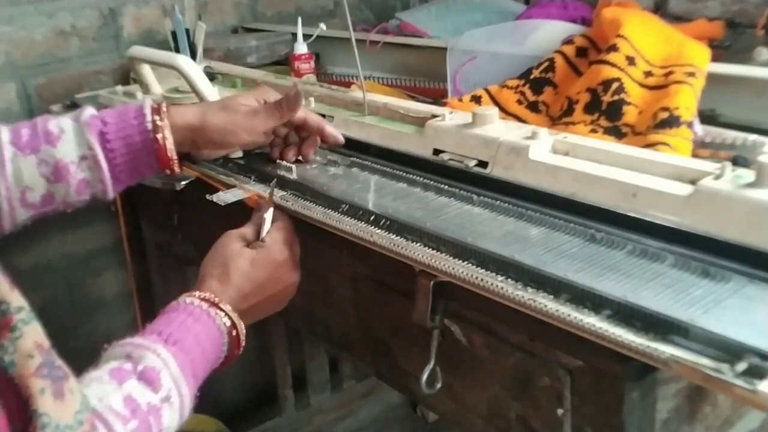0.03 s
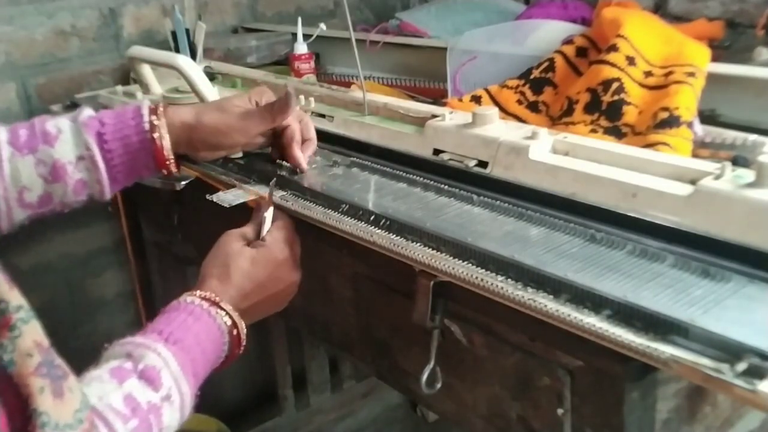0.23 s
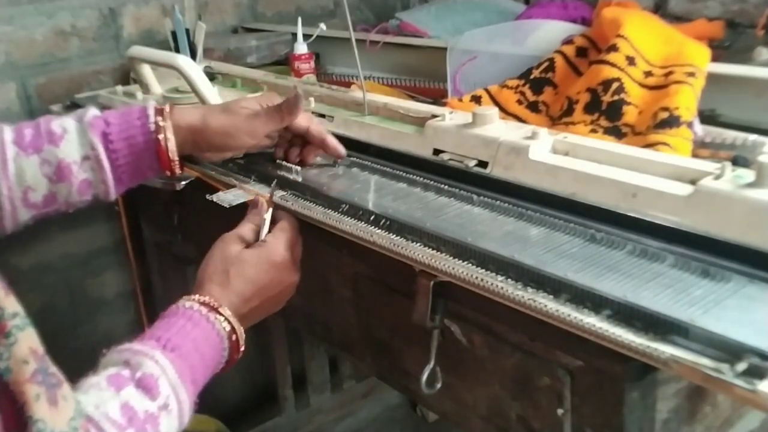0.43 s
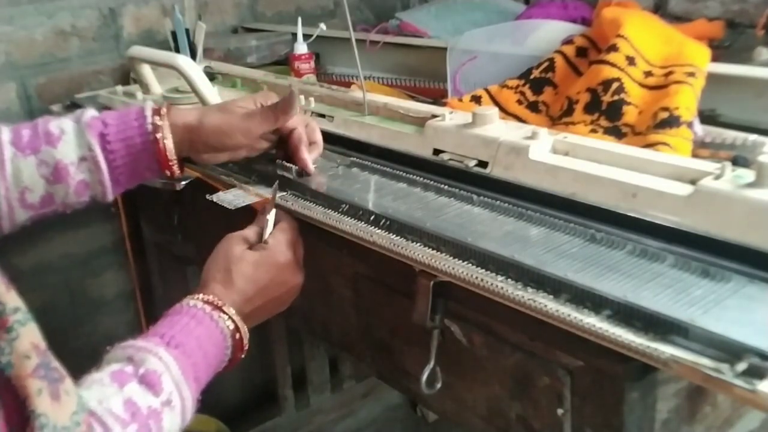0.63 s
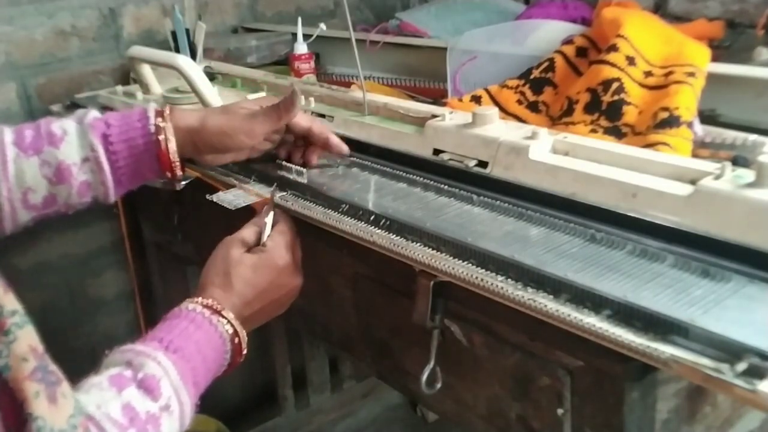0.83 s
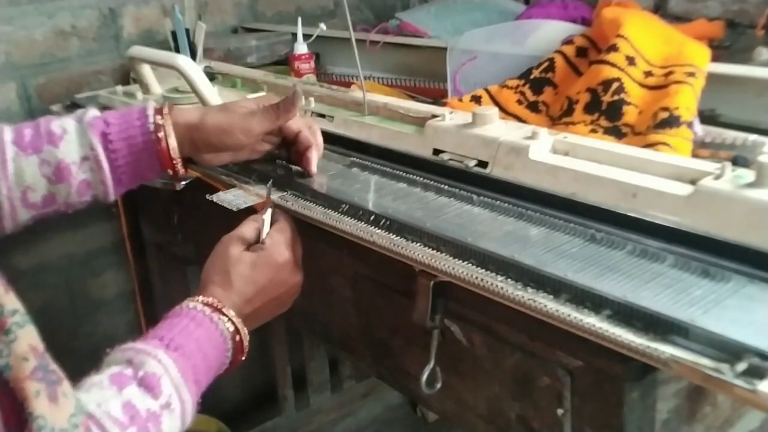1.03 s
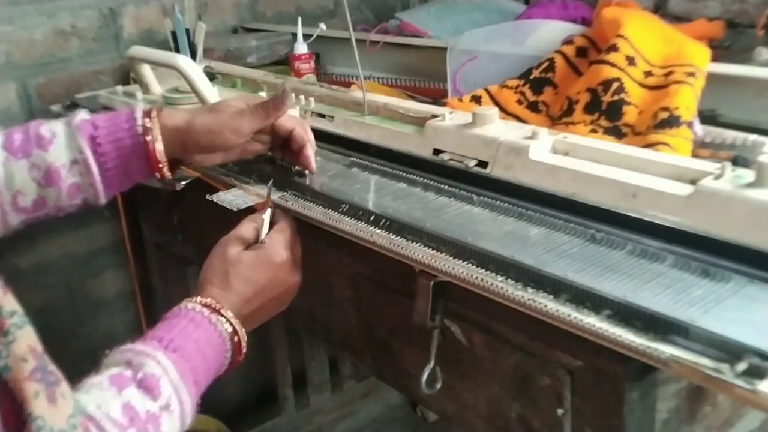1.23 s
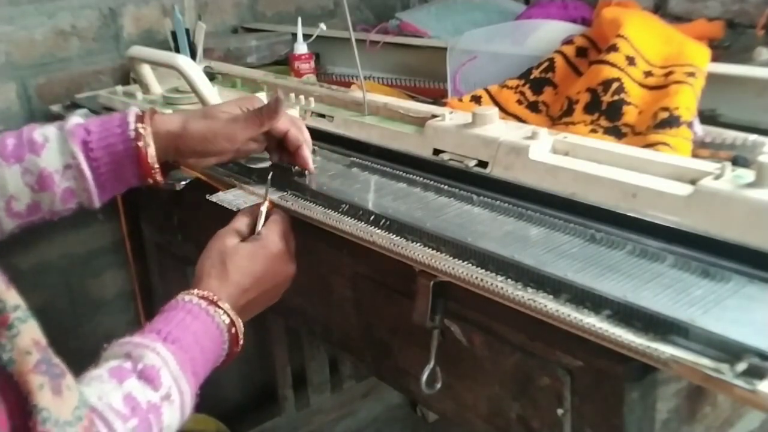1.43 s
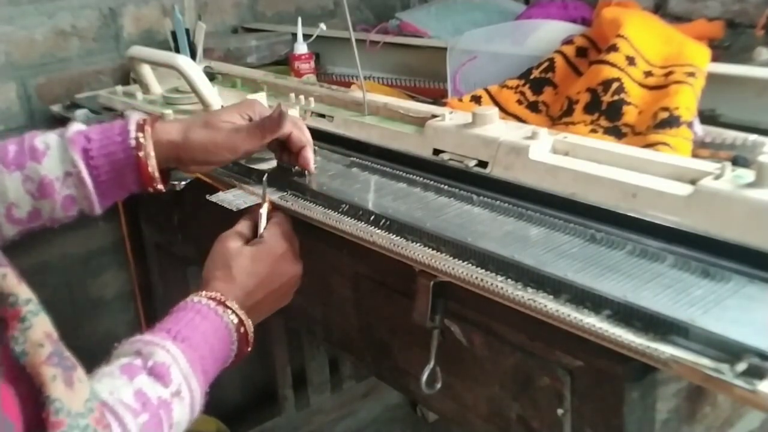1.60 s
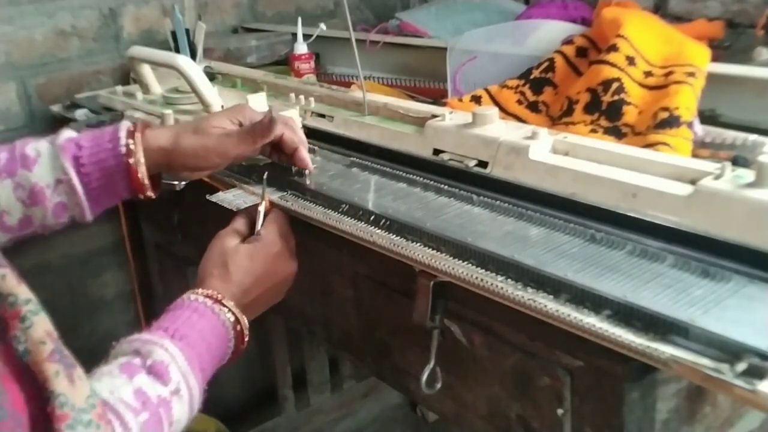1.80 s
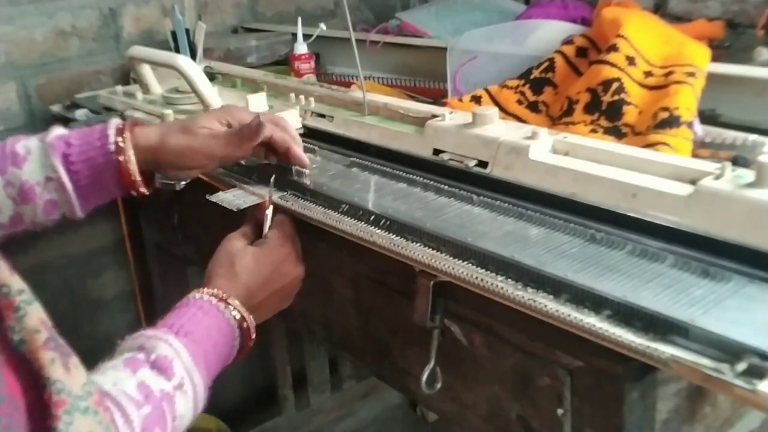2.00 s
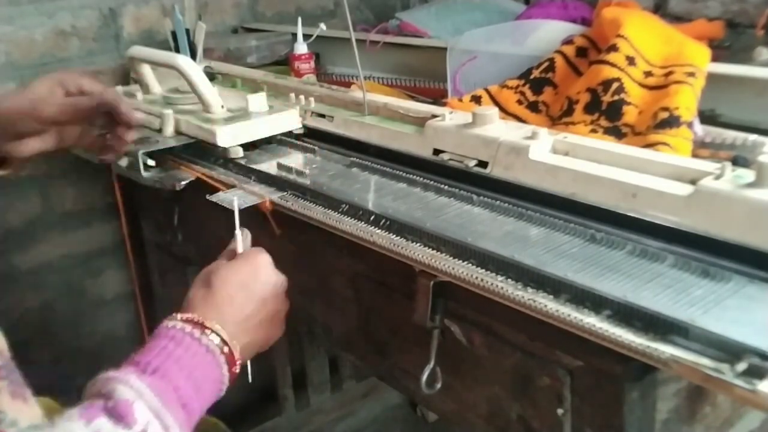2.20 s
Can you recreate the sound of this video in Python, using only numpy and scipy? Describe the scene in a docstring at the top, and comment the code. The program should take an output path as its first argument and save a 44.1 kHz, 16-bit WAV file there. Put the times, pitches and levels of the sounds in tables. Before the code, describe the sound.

Knitting machine needles clack sharply at about 0.2, 0.7 and 1.0 seconds, each led in by a light tick and briefly ringing the steel bed. Soft bumps and faint ticks come and go, and loose steel jingles lightly at 2.3 seconds. Behind them are a small room's quiet rumble and hum, joined from 0.6 seconds by a very faint, high, cricket-like trill.

```python
"""A hand sets the needles of a flat knitting machine in a small hard room, over a low rumble and a hum.
Soft bumps on the bed and faint ticks come and go from the start. Three sharp clacks, at 0.2, 0.7 and
1.0 s, are each led in by a light tick: a needle catches, strikes its stop and rings the steel bed.
From 0.6 s a thin high trill, like distant crickets, runs behind; a faint tone passes at 1.8 s.
At 2.3 s the hand reaches the carriage and loose steel jingles briefly."""
import sys
import numpy as np
from scipy import signal
from scipy.fft import rfft, irfft, next_fast_len
from scipy.io import wavfile
from scipy.ndimage import map_coordinates

SR = 44100
rng = np.random.default_rng(int(sys.argv[2]) if len(sys.argv) > 2 else 0)


def store_pcm(level_fs):
    """Save levels as 16-bit WAV."""
    pcm = np.round(np.clip(level_fs, -1, 1) * 32767).astype(np.int16)
    wavfile.write(sys.argv[1], SR, np.atleast_2d(pcm).T)


N = 103635


def amp(db):
    """Decibels to amplitude ratio."""
    return 10 ** (np.asarray(db) / 20)

def unit(x):
    """Normalisation to rms 1."""
    return x / np.sqrt(np.mean(x ** 2) + 1e-20)

def along(points, hz):
    """Interpolation of (frequency_hz, value) points on a log frequency axis."""
    f, v = np.transpose(points)
    return np.interp(np.log(hz + 1), np.log(f + 1), v)

def curve(rows):
    """Linear interpolation of (time_s, value) points at every sample."""
    return np.interp(np.arange(N) / SR, *np.transpose(rows))

def wobble(rate_hz):
    """Smooth random modulation: a spline through Gaussian knots."""
    knots = rng.standard_normal(int(N * rate_hz / SR) + 4)
    return map_coordinates(knots, [np.arange(N) * rate_hz / SR])

def pan(db):
    """Gains for a level difference, left over right."""
    return amp(np.array([[db], [-db]]) / 2)

def filtered(x, response):
    """Zero-phase filtering: the spectrum is multiplied by a frequency response."""
    m = next_fast_len(x.shape[-1] + SR // 2)
    return irfft(rfft(x, m) * response(np.fft.rfftfreq(m, 1 / SR)), m)[..., :x.shape[-1]]

def minimum_phase(gain, size=2048):
    """A causal impulse response of energy 1, from the folded cepstrum of a gain curve."""
    cepstrum = irfft(np.log(np.maximum(gain(np.fft.rfftfreq(size, 1 / SR)), 1e-6)))
    cepstrum[1:size // 2] *= 2
    cepstrum[size // 2 + 1:] = 0
    impulse = irfft(np.exp(rfft(cepstrum)))
    return impulse / np.linalg.norm(impulse)

def add(out, start_s, x):
    """Superposition of x on out."""
    i = max(0, round(start_s * SR))
    out[:, i:i + x.shape[-1]] += x[..., :max(0, N - i)]

def spread(pair, coherence):
    """Partial coherence: two independent noises mix as mid and side."""
    turn = lambda hz: np.arccos(np.clip(along(coherence, hz), -1, 1)) / 2
    mid, side = filtered(pair, lambda hz: np.array([np.cos(turn(hz)), np.sin(turn(hz))]))
    return np.array([mid + side, mid - side])

def chatter(envelope):
    """A noise burst of energy 1; partial spectral flattening keeps it unpitched."""
    raw = even = envelope * rng.standard_normal(len(envelope))
    for _ in range(4):
        even = irfft(np.exp(1j * np.angle(rfft(even))), len(raw)) * np.minimum(2 * envelope, 1)
    burst = unit(even) + .9 * unit(raw)
    return burst / np.linalg.norm(burst)

ATTACK_S, RELEASE_S = 0.00025, 0.0019
def contact(hold_s, colour, tilt_db_per_octave):
    """Source and filter: two parts chatter briefly, coloured by the body that is struck."""
    t = np.arange(SR // 10) / SR
    envelope = (1 - np.exp(-t / ATTACK_S)) * np.exp(-np.maximum(t - hold_s, 0) / RELEASE_S)
    body = minimum_phase(lambda hz: colour(hz) * amp(tilt_db_per_octave * np.log2(hz + 200)))
    hit = signal.fftconvolve(chatter(envelope), body)
    return hit * np.linalg.norm(envelope) / np.linalg.norm(hit)

def ringing(modes, build_s):
    """Free vibration: damped modes with jittering phase, different in each channel."""
    t = np.arange(SR // 2) / SR
    ring = np.zeros((2, len(t)))
    for hz, db, t60_s in modes:
        decay = amp(db + rng.normal(0, 1.8) - 60 * t / t60_s)
        phase = 2 * np.pi * (hz * t + rng.random((2, 1)))
        ring += decay * np.sin(phase + .5 * wobble(62)[:len(t)])
    return ring * (1 - np.exp(-t / build_s))

# Reverberation time: frequency_hz, t60_s
ROOM_DECAY = [(150, 0.5841), (400, 0.26), (1040, 0.2929), (2760, 0.2853), (7280, 0.2341), (14000, 0.1523)]
# Colour of the reverberation: frequency_hz, gain_db
ROOM_SPECTRUM = [(100, 5.5), (300, 4.5), (550, 6), (850, 5.5), (2000, -3), (5000, 0.5), (8500, -7),
                 (12000, 3), (15000, -8), (16000, -8.5)]
# Its left-right likeness: frequency_hz, coherence
ROOM_COHERENCE = [(100, 1), (300, 0.6), (700, .4), (1500, 0), (4000, 0.11)]
ROOM_DB, ROOM_DELAY_S, ROOM_BUILD_S = -1, 0.001, 0.0027
def room_tail():
    """Diffuse reverberation: reflections build up, then absorption takes the treble first."""
    noise = spread(rng.standard_normal((2, SR // 2)), ROOM_COHERENCE)
    hz, t, bands = signal.stft(noise, SR, nperseg=256)
    tail = signal.istft(bands * amp(-60 * t / along(ROOM_DECAY, hz)[:, None]), SR, nperseg=256)[1]
    age_s = np.maximum(np.arange(tail.shape[1]) / SR - ROOM_DELAY_S, 0)
    tail *= 1 - np.exp(-age_s / ROOM_BUILD_S)
    return filtered(tail / np.linalg.norm(tail[0]), lambda f: amp(along(ROOM_SPECTRUM, f)))

SCATTER_S, SCATTER_DB, SCATTER_LOW_HZ, RADIATION_LOW_HZ = 0.0022, 3, 1170, 892
def in_room(x, room_db, pan_db):
    """Multipath propagation: direct sound, treble scattered off the machine, and wall reflections."""
    highpass = lambda y, hz: signal.lfilter(*signal.butter(1, hz, 'high', fs=SR), y)
    tail = room_tail()
    fade = np.exp(-np.arange(tail.shape[1]) / SR / SCATTER_S)
    near = amp(SCATTER_DB) * highpass([chatter(fade), chatter(fade)], SCATTER_LOW_HZ)
    near[0, 0] += 1
    near[1, 4] += 1  # the direct sound reaches the right 4 samples later
    near /= np.linalg.norm(near, axis=1, keepdims=True)
    near = highpass(near, RADIATION_LOW_HZ)  # small parts radiate little bass
    return signal.fftconvolve(x[None], near * pan(pan_db) + amp(ROOM_DB + room_db) * tail, axes=1)

# Colour of the ambient noise: frequency_hz, relative_db
AIR_SPECTRUM = [(20, -30), (35, -10), (70, -7.5), (130, -5.5), (200, -10.5), (400, -15), (750, -17.5),
                (1050, -22), (2800, -25), (6000, -27), (12000, -29.5), (15500, -33)]
# Its left-right likeness: frequency_hz, coherence
AIR_COHERENCE = [(50, .93), (150, .85), (400, 0.68), (1000, 0.056), (4000, 0), (15000, 0.011)]
# Its course: time_s, level_db
AIR_LEVEL = [(0, -65), (.8, -63.5), (1.25, -63), (1.55, -67), (2.35, -67)]
AIR_TOP_HZ, RUMBLE_HZ, RUMBLE_SWING_DB = 15600, 600, -1.5
def room_air():
    """Broadband ambient noise; amplitude modulation of its low band makes a restless rumble."""
    noise = spread(rng.standard_normal((2, N)), AIR_COHERENCE)
    air = unit(filtered(noise, lambda hz: amp(along(AIR_SPECTRUM, hz)) * (hz < AIR_TOP_HZ)))
    low = filtered(air, lambda hz: 1 / (1 + (hz / RUMBLE_HZ) ** 4))
    rumble = low * pan(db=1.5) * amp(RUMBLE_SWING_DB * wobble(5.2))
    return amp(curve(AIR_LEVEL)) * (air - low + rumble)

# Course of the hum's lower tone: time_s, level_db
HUM_LEVEL = [(0, -56.5), (.06, -63), (.18, -58), (.3, -60.5), (.52, -64), (.58, -74), (.72, -62.5),
             (.82, -58), (.91, -78), (1.1, -85), (1.24, -60.5), (1.33, -77.5), (1.42, -67.5), (1.9, -68),
             (2.1, -67.5), (2.35, -72.5)]
HUM_HZ, UPPER_HZ, UPPER_DB = 54.7, 100.3, -70.5
def hum():
    """Two low tones waver by amplitude and phase modulation."""
    t = np.arange(N) / SR
    lower = amp(curve(HUM_LEVEL)) * unit(np.sin(2 * np.pi * HUM_HZ * t + 0.78 * wobble(4.8)))
    upper = amp(UPPER_DB + 2 * wobble(19)) * unit(np.sin(2 * np.pi * UPPER_HZ * t + 2.7 * wobble(17)))
    return (lower + upper) * pan(db=3.5)

# Colour of a bump: frequency_hz, gain_db
BUMP_SPECTRUM = [(40, -17.5), (150, -5), (300, -1.5), (750, -2.5), (1200, -10), (2800, -9.5), (6000, -19.5),
                 (15000, -30.5)]
# Touches on the bed: start_s, level_db, hold_s, tilt_db_per_octave
BED_BUMPS = [(.003, -59, 0.016, 5.5), (0.421, -60, 0.024, 1.5), (0.909, -64, .03, 4.5),
             (1.388, -72.5, .04, 1.5), (1.772, -60.5, 0.012, 0.5), (1.865, -70, .03, -1),
             (2.001, -62, 0.0097, -3.5), (2.024, -67, .03, -2)]
def bumps():
    """Soft impact: hand and tool meet the bed in long, weak contacts."""
    out = np.zeros((2, N))
    for start_s, db, hold_s, tilt in BED_BUMPS:
        touch = contact(hold_s, lambda hz: amp(along(BUMP_SPECTRUM, hz)), tilt)
        add(out, start_s, amp(db) * in_room(touch, room_db=-1, pan_db=1.5))
    return out

# Resonances of the needle bed: centre_hz, width_hz, peak_db
BED_RESONANCES = [(900, 160, -7.5), (1370, 200, -9.5), (2176, 850, -12), (3450, 330, -10), (4770, 720, -10),
                  (6350, 770, -7.5), (8310, 730, 1), (8910, 450, -1), (10330, 400, -8.5), (13100, 630, -3)]
# Broad colour of a hard impact: frequency_hz, gain_db
SNAP_SPECTRUM = [(40, -25.5), (150, -19.5), (400, -15.5), (900, -18), (2000, -14), (4000, -9.5),
                 (7500, -3.5), (11000, -7.5), (14000, -5.5), (15200, 0), (16400, -40.5)]
def bed_response(hz):
    """Frequency response of the bed: resonance peaks add in power to a broad snap."""
    peaks = sum(amp(db) ** 2 / (1 + (2 * (hz - centre) / width) ** 2)
                for centre, width, db in BED_RESONANCES)
    return np.sqrt(amp(along(SNAP_SPECTRUM, hz)) ** 2 + 2 * peaks * hz / (hz + 300))

# Needles catching: start_s, level_db, hold_s, tilt_db_per_octave, body_db, room_db
NEEDLE_TICKS = [(0.122, -66, 0.0039, -2, 0, 0), (0.15, -57, .003, 0.5, 11, 0),
                (0.189, -39, 0.003, 2, 2, 6.5), (0.6382, -39, 0.0021, 0, 4, 4),
                (0.643, -38, 0.0012, 5, 11, -3.5), (2.2693, -44.5, 0.00293, 2.5, -7, 1),
                (2.279, -60.5, 0.0063, 6, -3, -24), (.537, -61, .003, 1, 0, 1), (.789, -60, .002, 1, 0, 1),
                (1.02, -53, .007, -2.5, 4, 1), (1.484, -53, .002, 0, 4, 0), (1.775, -60, .002, -5, 13, -1),
                (2.297, -44, .006, 1.2, -4, 1), ]
# Needles striking their stop: same columns
NEEDLE_CLACKS = [(0.2206, -14, 0.0035, -0.22, -3, 0), (0.6698, -22, 0.0055, 1, -0.5, -2),
                 (1.045, -15, 0.0019, 0.64, 0.5, 3.5)]
# Modes of the bed after a clack: pitch_hz, relative_db, t60_s
BED_MODES = [(320, -42, .3), (800, -38, .28), (928, -32, .26), (1322, -35, .25), (4474, -38, .33),
             (5420, -34, .2), (6085, -34, .22), (6250, -35, .2), (6432, -32, .22), (8909, -29, .18),
             (9466, -31, .18), (10503, -33, .17), (13100, -32, .15)]
BODY_HZ, BODY_OCTAVES = 2050, 0.59
def needles():
    """Impact excitation: needles tick and clack, and each clack leaves the bed's modes ringing."""
    out = np.zeros((2, N))
    body_band = lambda hz: np.exp(-(np.log2((hz + 1) / BODY_HZ) / BODY_OCTAVES) ** 2)
    for start_s, db, hold_s, tilt, body_db, room_db in NEEDLE_CLACKS + NEEDLE_TICKS:
        hit = contact(hold_s, lambda hz: bed_response(hz) * amp(body_db * body_band(hz)), tilt)
        add(out, start_s, amp(db) * in_room(hit, room_db, pan_db=-1.5))
    for start_s, db, *_ in NEEDLE_CLACKS:
        add(out, start_s, amp(db) * ringing(BED_MODES, build_s=0.00486))
    return out

# Cricket-like trills: start_s, end_s, pitch_hz, level_db, chirp_rate_hz, pan_db
TRILLS = [(.57, 1.12, 3545, -77.5, 10, -2), (1.12, 2.4, 3545, -72, 10, -3), (1.85, 2.4, 3470, -75, 11, -3)]
CHIRP_BEND_HZ, CHIRP_DEPTH_DB, FLUTTER_HZ, FLUTTER_DB = 22, 1.5, 25, 2
def trill():
    """Amplitude and frequency modulation: chirps swell and bend a tone, heard mostly off the walls."""
    out, t = np.zeros((2, N)), np.arange(N) / SR
    for start_s, end_s, hz, db, rate_hz, pan_db in TRILLS:
        chirp = np.sin(2 * np.pi * rate_hz * t + wobble(4))
        pitch = hz + CHIRP_BEND_HZ * chirp + FLUTTER_HZ * wobble(120)
        swell = amp(CHIRP_DEPTH_DB * chirp + FLUTTER_DB * wobble(70))
        tone = unit(swell * np.sin(2 * np.pi * np.cumsum(pitch) / SR))
        direct = tone * np.array([[1], [-1]])  # left and right in antiphase
        echo = unit(signal.fftconvolve(tone[None], room_tail(), axes=1)[:, :N])
        gate = np.clip(np.minimum(t - start_s, end_s - t) / 0.0072, 0, 1)
        out += amp(db) * gate * pan(pan_db) * unit(.5 * direct + .9 * echo)
    return out

def thin_tone(start_s=1.78, end_s=1.99, pitch_hz=812, level_db=-77):
    """A faint sinusoid comes and goes under random amplitude and phase modulation."""
    t = np.arange(N) / SR
    gate = np.clip(np.minimum(t - start_s, end_s - t) / 0.035, 0, 1)
    envelope = gate * amp(level_db + 1.6 * wobble(20))
    return envelope * unit(np.sin(2 * np.pi * pitch_hz * t + .5 * wobble(30.4)))

# Modes of the loose steel: pitch_hz, relative_db, t60_s
STEEL_MODES = [(4480, -5, .14), (5050, 3, .15), (5210, -6, .12), (6508, -6, .11), (9620, -3, .1),
               (10300, -4, .07), (14660, -7, .1)]
# Knocks that excite them: start_s, level_db
STEEL_KNOCKS = [(2.27, -67), (2.292, -54), (2.298, -55)]
def jingle():
    """Inharmonic modal decay: loose steel on the carriage rings briefly."""
    out = np.zeros((2, N))
    for start_s, db in STEEL_KNOCKS:
        add(out, start_s, amp(db) * ringing(STEEL_MODES, ATTACK_S))
    return out

def scene():
    """Superposition of the machine and the quiet room."""
    return room_air() + hum() + bumps() + needles() + trill() + thin_tone() + jingle()

TOP_HZ, TOP_FADE_HZ = 16200, 1200
def record(dry):
    """Band limiting: the highest treble tapers to nothing."""
    return filtered(dry, lambda hz: np.clip((TOP_HZ - hz) / TOP_FADE_HZ, 0, 1))


dry = scene()
out = record(dry)
store_pcm(out)
```